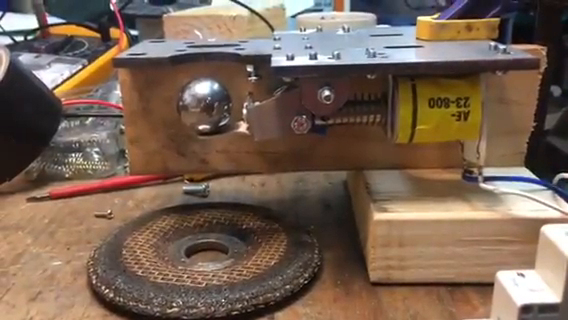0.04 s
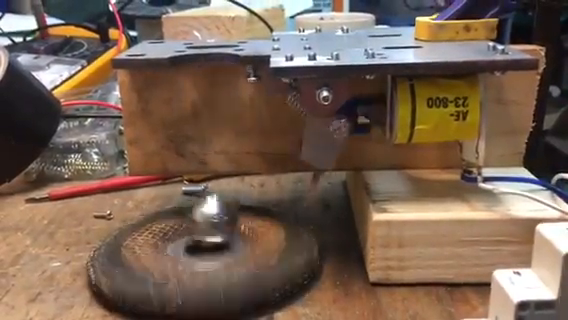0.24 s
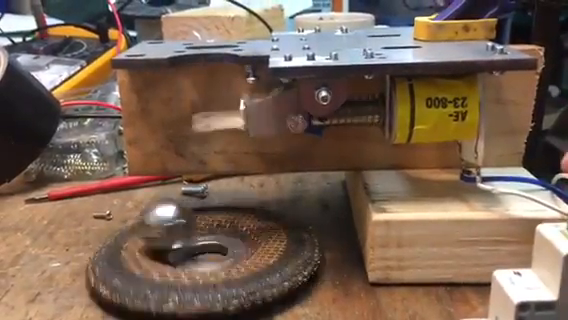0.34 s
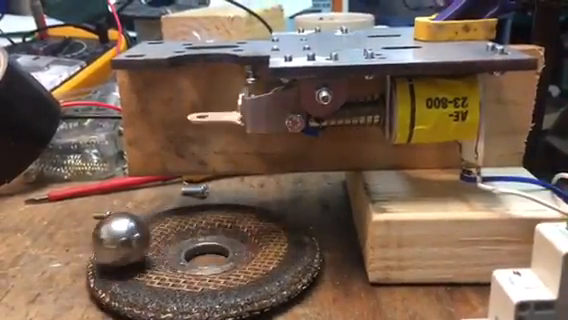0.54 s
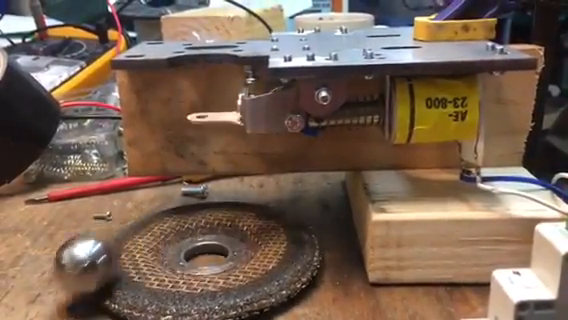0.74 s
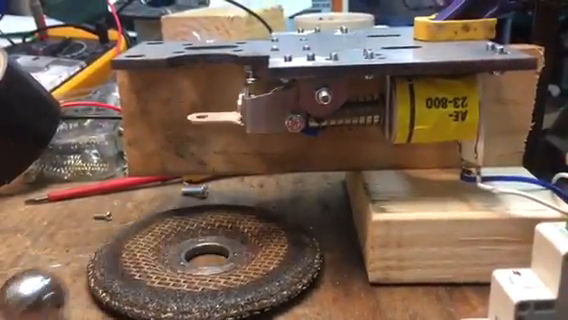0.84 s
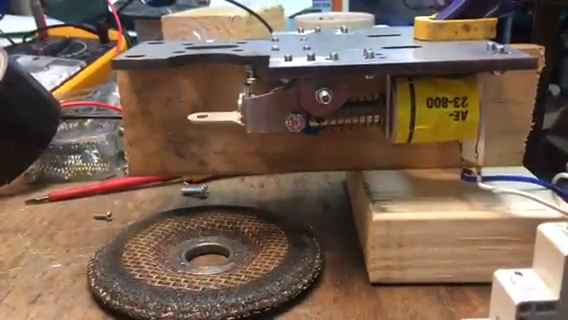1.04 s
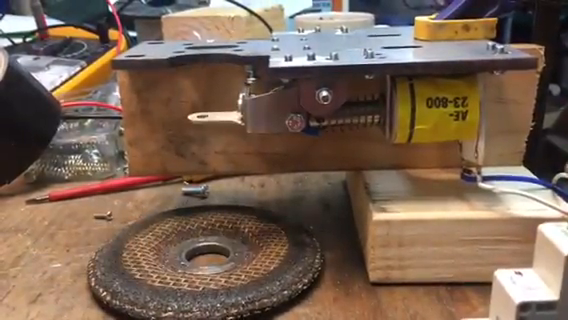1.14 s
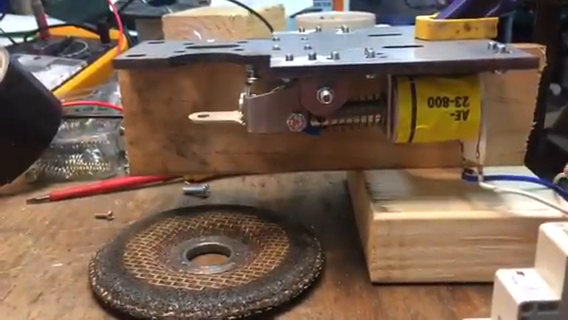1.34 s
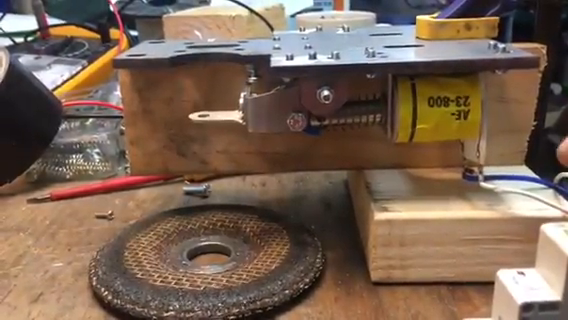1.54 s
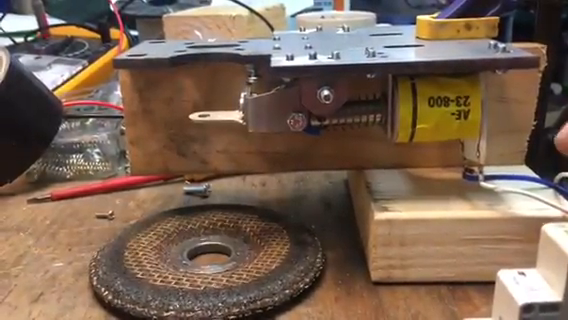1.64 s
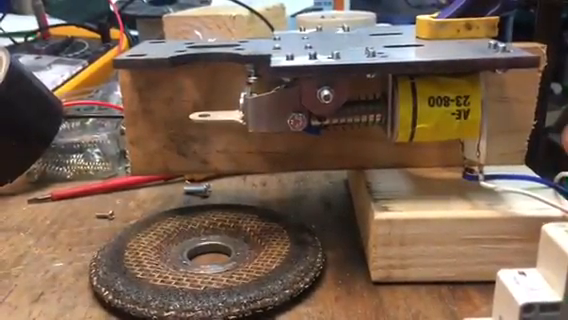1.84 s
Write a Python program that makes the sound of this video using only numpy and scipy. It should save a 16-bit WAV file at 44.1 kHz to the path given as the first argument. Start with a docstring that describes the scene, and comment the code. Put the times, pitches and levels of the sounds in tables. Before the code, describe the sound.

A small metal ball drops and rolls, close to the microphone in a quiet workshop. A latch snaps open and shut around its hard clack on an abrasive disc, then come quickening dull bounces and a soft rumble on wood.

```python
"""A steel ball drops on an abrasive disc lying on a wooden workbench, heard from one close microphone.
A solenoid latch snaps open to release it and slams shut while it bounces, jolting its wooden mount.
The ball ticks across the grit, falls off the rim, bounces ever faster on the ringing bench and rumbles
away, nudging things. Behind it a small workshop hums and gives each blow a short reverberation."""
import sys
import numpy as np
from scipy import signal
from scipy.fft import rfft, irfft, next_fast_len
from scipy.io import wavfile

SR = 44100
rng = np.random.default_rng(int(sys.argv[2]) if len(sys.argv) > 2 else 0)


def wav_record(signal):
    """Record a signal, one row per channel, as 16-bit PCM in the file named by sys.argv[1]."""
    frames = np.transpose(np.atleast_2d(signal))
    bounded = np.clip(frames, -1, 1)
    # unit amplitude maps onto the largest positive 16-bit level
    quanta = np.round(bounded * 32767).astype(np.int16)
    wavfile.write(sys.argv[1], SR, quanta)


N = 83790
SIZE = 16384  # samples in one blow
T, HZ = np.arange(SIZE) / SR, np.fft.rfftfreq(SIZE, 1 / SR)


def amp(db):
    """Decibels to gain."""
    return 10 ** (np.asarray(db) / 20)


def along(points, hz):
    """Read (frequency, value) points on a log frequency axis."""
    freqs, values = np.transpose(points)
    return np.interp(np.log(hz + 1), np.log(freqs + 1), values)


def level(curve):
    """A gain per sample from (time, level) points."""
    return amp(np.interp(np.arange(N) / SR, *np.transpose(curve)))


def fade(t, t60):
    """Exponential decay, 60 dB down after t60."""
    return np.exp(-np.log(1000) * t / t60)


def add(track, start_s, x):
    """Mix a sound into the track."""
    part = track[round(start_s * SR):][:len(x)]
    part += x[:len(part)]


def noise(colour):
    """Steady coloured noise of rms 1."""
    gain = amp(along(colour, np.fft.rfftfreq(N, 1 / SR)))
    x = irfft(rfft(rng.standard_normal(N)) * gain, N)
    return x / x.std()


def shaped(x, gain):
    """Filter a blow with minimum phase, so nothing sounds ahead of the contact."""
    cepstrum = irfft(np.log(np.maximum(gain, 1e-6)))
    cepstrum[1:SIZE // 2] *= 2
    cepstrum[SIZE // 2 + 1:] = 0
    return signal.fftconvolve(x, irfft(np.exp(rfft(cepstrum))))[:SIZE]


def tilted(x, db_per_octave):
    """Harder contacts are brighter, softer ones duller: the spectrum pivots at 2 kHz."""
    return shaped(x, amp(db_per_octave * np.log2(np.maximum(HZ, 500) / 2000)))


def ring(modes, scatter_db, pitch=1, drift_rad=1.8):
    """Damped modes with wandering phase, each stronger or weaker at every blow."""
    out = np.zeros(SIZE)
    for k, (hz, db, t60) in enumerate(modes):
        drift = drift_rad * np.cumsum(rng.standard_normal(SIZE)) / np.sqrt(t60 * SR)
        gain = (-1) ** k * amp(db + scatter_db * rng.standard_normal())
        out += gain * np.sin(2 * np.pi * hz * pitch * T + drift) * fade(T, t60)
    return out


def crack(colour, t60, snap, burst_s, clatter_db):
    """A sharp first pulse and a short burst, with a weaker clatter that dies in t60."""
    x = rng.standard_normal(SIZE) * (fade(T, burst_s) + amp(clatter_db) * fade(T, t60))
    x /= np.linalg.norm(x)
    x[0] += snap
    return shaped(x / np.hypot(1, snap), amp(along(colour, HZ)))


# Reverberation of the small workshop (frequency [Hz], t60 [s])
ROOM_DECAY = [(100, 0.35), (500, 0.17), (2000, 0.19), (8000, 0.14), (16000, 0.17)]


def in_room(x, wet_db=-13.5, delay_s=0.0029):
    """A blow reaches the close microphone directly, then as the room's short, weaker answer."""
    hz, t, spectra = signal.stft(rng.standard_normal(SIZE), SR, nperseg=256)
    spectra = spectra * fade(t, along(ROOM_DECAY, hz)[:, None])
    tail = signal.istft(spectra, SR, nperseg=256)[1][:SIZE]
    tail *= np.clip(T / delay_s - 1, 0, 1)
    return x + amp(wet_db) * signal.fftconvolve(x, tail / np.linalg.norm(tail))[:SIZE]


# Spectrum of the workshop's air (frequency [Hz], level [dB])
AIR_SPECTRUM = [(59, -29.5), (100, -2.5), (181, -20), (570, -31), (970, -26), (1150, -24), (1390, -28),
                (1720, -27.5), (1910, -30.5), (16000, -52)]
# Tones of a machine in the background (frequency [Hz], level [dB])
HUM_TONES = [(560, -73.5), (1120, -70), (1683, -80.5)]


def workshop():
    """Room tone behind the bench: faint air noise and a steady machine hum."""
    t = np.arange(N) / SR
    hum = sum(np.sqrt(2) * amp(db) * np.sin(2 * np.pi * (hz * t + rng.random())) for hz, db in HUM_TONES)
    return hum + amp(-62.5) * noise(AIR_SPECTRUM)


# Course of the bench's low rumble (time [s], level [dB])
RUMBLE_LEVELS = [(0, -53.5), (.6, -56.5), (1.0, -55.5), (1.15, -47), (1.21, -41), (1.27, -55), (1.36, -45),
                 (1.48, -47.5), (1.72, -52.5), (1.88, -48.5)]
# Its spectrum (frequency [Hz], level [dB])
RUMBLE_SPECTRUM = [(20, -38), (40, -9), (60, 4), (76, 0), (100, -18.5), (200, -28), (600, -72)]
# Course of the ball's rolling murmur (time [s], level [dB])
ROLL_LEVELS = [(.48, -76), (.54, -59), (.75, -66), (.85, -51), (1.0, -50.5), (1.12, -53), (1.22, -55.5),
               (1.32, -54), (1.5, -60), (1.68, -55), (1.88, -66)]
# Its spectrum (frequency [Hz], level [dB])
ROLL_SPECTRUM = [(30, -29), (150, -10), (300, 2.5), (480, -4.5), (700, -22), (1300, -23), (2500, -43),
                 (8000, -59.5)]


def rolling():
    """The rolling ball murmurs in the wood over the bench's low rumble."""
    return level(ROLL_LEVELS) * noise(ROLL_SPECTRUM) + level(RUMBLE_LEVELS) * noise(RUMBLE_SPECTRUM)


# Brief high rings (time [s], level [dB], pitch [Hz], t60 [s], overtone level [dB])
HIGH_RINGS = [(0.3445, -16, 5300, .016, -16.5), (.3625, -34, 8400, 0.0097, -17),
              (0.389, -15, 9930, 0.12, -40.5), (0.4365, -20.5, 7803, 0.011, -41),
              (0.4767, -36, 7775, 0.016, -41), (1.6053, -44, 8180, 0.053, -29)]
# Crack at the start of each (frequency [Hz], level [dB])
ONSET_SPECTRUM = [(300, -15.5), (2000, 5), (8000, -13), (16000, -11.5)]


def high_rings(overtone_ratio=2.1):
    """Brief high rings: the disc as the ball strikes it, the latch spring, and a few small clinks."""
    out = np.zeros(N)
    for s, db, hz, t60, overtone_db in HIGH_RINGS:
        tone = ring([(hz, 0, t60), (hz * overtone_ratio, overtone_db, t60)], scatter_db=17)
        onset = amp(12) * crack(ONSET_SPECTRUM, t60=0.022, snap=0.55, burst_s=0.005, clatter_db=-10.5)
        add(out, s, in_room(amp(db) * (tone + onset)))
    return out


# The latch opens, then shuts (time [s], level [dB], brightness [dB/octave], relative jolt level [dB])
LATCH_HITS = [(.151, -34.5, -1.5, -73.5), (0.1967, -20.5, 2, -64), (0.2052, -18.5, -0.5, -67.5),
              (0.2084, 2, 0.5, -27), (.2182, -6.5, -1, -20.5), (0.2366, -30.5, -6, -45),
              (.2475, -32, -8.5, -45.5), (0.2643, -25, -4.5, -40.5), (.288, -29.5, 0, -60.5),
              (0.2979, -28, -4.5, -54), (0.3896, -2.5, 2.5, -4), (0.3931, -1, 1, -12.5),
              (0.4005, -2, -1, -23.5), (0.4056, -9, 4, -29), (0.4115, -16.5, -2.5, -33),
              (0.4235, -12, -3, -28), (.429, -13.5, -1, -25.5)]
# Crack of steel on its stop (frequency [Hz], level [dB])
LATCH_SPECTRUM = [(100, -16.5), (400, -1), (900, 1.5), (1700, -6), (2500, -1.5), (5000, -10), (8000, -3),
                  (12000, -9), (16000, -10.5)]
# Modes of the steel latch (frequency [Hz], level [dB], t60 [s])
LATCH_RING = [(321, -32, 0.14), (424, -31.5, 0.1), (545, -28, 0.1125), (1173, -29, 0.11),
              (1265, -24.5, 0.055), (1695, -17.5, 0.047), (1928, -22, 0.036), (2674, -27, .05),
              (2958, -31, 0.079), (3655, -29.5, 0.058), (4190, -28, 0.042), (5460, -25.5, .05),
              (7750, -25.5, 0.048)]
# Low modes of its wooden mount (frequency [Hz], level [dB], t60 [s])
MOUNT_RING = [(48, 0.5, 0.066), (82, -5, 0.17), (117.5, -0.5, .08), (158, 3, 0.057), (208, 0.5, 0.038)]


def latch():
    """Close up, the steel latch hits its stops and rattles, jolting its wooden mount."""
    out = np.zeros(N)
    for s, db, brightness, jolt_db in LATCH_HITS:
        strike = crack(LATCH_SPECTRUM, t60=0.096, snap=0.23, burst_s=0.023, clatter_db=-11.5)
        steel = amp(12.5) * strike + ring(LATCH_RING, scatter_db=1.5)
        add(out, s, in_room(amp(db) * tilted(steel, brightness)))
        add(out, s, amp(jolt_db - 15) * ring(MOUNT_RING, scatter_db=3.5))
    return out


# The ball lands on the disc (time [s], level [dB], brightness [dB/octave])
DISC_HITS = [(.3179, -2, 3), (.3210, -4, -4), (.3302, -2.5, 0.5), (.337, -8, -1.5), (0.3445, -14, 4),
             (0.4367, -9, 2), (0.4783, -15.5, -1)]
# Crack of ball on disc (frequency [Hz], level [dB])
DISC_SPECTRUM = [(100, -26), (300, -3.5), (550, 2.5), (1300, 6), (2300, -1), (3700, -2), (7500, -9.5),
                 (9000, -20.5), (13500, -17.5), (16000, -25)]
# Modes of the disc (frequency [Hz], level [dB], t60 [s])
DISC_RING = [(497.6, -14.5, 0.059), (704.5, -22.5, 0.04), (886.5, -22, 0.086), (1172, -25.5, 0.092),
             (1478, -31.5, 0.15), (1583, -24.5, 0.092), (2900, -31.5, 0.15), (3040, -32, 0.13),
             (3478, -24, 0.03), (3910, -29.5, 0.067), (5820, -35.5, 0.05), (7770, -27.5, 0.051)]


def ball_on_disc():
    """The dropped ball clacks on the abrasive disc and sets it ringing."""
    out = np.zeros(N)
    for s, db, brightness in DISC_HITS:
        strike = crack(DISC_SPECTRUM, t60=0.04, snap=0.83, burst_s=0.019, clatter_db=-9)
        clack = amp(13.5) * strike + ring(DISC_RING, scatter_db=1.5)
        add(out, s, in_room(amp(db) * tilted(clack, brightness)))
    return out


# The ball meets grains of grit (time [s], relative level [dB], brightness [dB/octave])
GRIT_HITS = [(0.536, -20, -3), (0.593, -9, -4), (0.6129, -8.5, -6.5), (0.6218, 3, -6), (.651, -5.5, -5),
             (.6965, 0, -3), (0.7236, -7, -5.5), (0.7604, -4.5, -2), (0.7844, -8.5, 1.5), (.789, 3, -6),
             (0.802, -27, 5), (0.8216, -13.5, -4), (.828, 8.5, -3.5), (0.8312, -1.5, 0.5),
             (.8435, -13.5, 5), (.853, -6.5, -15.5), (0.8575, 7.5, 2.5)]
# Crack of one grain (frequency [Hz], level [dB])
GRIT_SPECTRUM = [(200, 2), (1000, 12), (3500, -3), (8000, -8.5), (16000, -7)]
# Modes rung by a tick (frequency [Hz], level [dB], t60 [s])
GRIT_RING = [(977, -12.5, .03), (2200, -8, 0.058), (2670, -3.5, 0.015), (3706, -5, .025), (3875, -4, 0.019),
             (5520, -9, 0.035), (7790, -2, 0.013), (10600, -15.5, 0.016)]


def ball_on_grit(gain_db=-48):
    """The ball ticks over the disc's grit, faint even this close."""
    out = np.zeros(N)
    for s, db, brightness in GRIT_HITS:
        grain = crack(GRIT_SPECTRUM, t60=0.018, snap=0.51, burst_s=0.012, clatter_db=-4.5)
        tick = amp(16.5) * grain + ring(GRIT_RING, scatter_db=5.5)
        add(out, s, in_room(amp(gain_db + db) * tilted(tick, brightness)))
    return out


def bounces(fall_s=0.8712, fall_db=2.5, cutoff_hz=2030, first_flight_s=0.0387, restitution=0.71):
    """Off the rim, the ball loses energy at each knock: the next is sooner, quieter and duller."""
    knocks = []
    for k in range(9):
        s = fall_s + first_flight_s * (1 - restitution ** k) / (1 - restitution)
        knocks.append((s, fall_db - 6 * k ** 0.69, cutoff_hz * 0.88 ** k, 1))
    return knocks


# Dull knocks on the bench (time [s], level [dB], contact cut-off [Hz], pitch of the bench's modes [ratio])
BENCH_KNOCKS = [(.3672, -12, 3020, 1.34), (.3868, -0.5, 1820, 0.96), (.3970, -1, 2220, 0.93),
                (.4558, -9.5, 1810, 0.95), (.498, -33, 1300, 1.9), (.540, -34, 1462, 0.66),
                (1.029, -30.5, 700, .9), (1.055, -28.5, 650, 0.75), (1.083, -27, 550, 0.66),
                (1.118, -23.5, 600, 0.54), (1.198, -21.5, 541, 0.58), (1.25, -33, 696, 0.69),
                (1.339, -30.5, 699, 0.692), (1.427, -29, 451, 0.68), (1.5795, -23.5, 1190, 0.71),
                (1.589, -23.5, 994, 0.78), (1.712, -28.5, 950, 0.76), (1.7755, -31.5, 806, 0.57),
                (1.892, -34.5, 894, 0.83)]
# Thud of the wood (frequency [Hz], level [dB])
BENCH_SPECTRUM = [(80, -27), (250, -10), (500, 1), (1400, -5.5), (2300, -4.5), (4000, 1.5), (7000, -7.5),
                  (16000, -10)]
# Modes of the bench (frequency [Hz], level [dB], t60 [s])
BENCH_RING = [(357.9, -24.5, 0.034), (432, -23, .06), (510, -21, 0.1), (602, -20.5, .035), (821, -20, .025),
              (1012, -12.5, 0.023), (1137, -19.5, 0.039), (1312, -15, 0.027), (1605, -17, 0.034),
              (1850, -16.5, 0.021), (2600, -20.5, 0.034), (3790, -16.5, .02)]
# Reflections off nearby boards (delay [s], gain [ratio])
BOARD_ECHOES = [(.0012, 0.2), (.0039, 0.48)]


def ball_on_bench():
    """Knocks and bounces ring the same wood by the microphone; gentler contacts are duller."""
    out = np.zeros(N)
    for s, db, cutoff_hz, pitch in list(BENCH_KNOCKS) + bounces():
        thud = amp(12) * crack(BENCH_SPECTRUM, t60=0.0435, snap=0.67, burst_s=0.019, clatter_db=-10)
        echoes = sum(gain * np.interp(T - delay, T, thud, left=0) for delay, gain in BOARD_ECHOES)
        wood = thud + echoes + ring(BENCH_RING, scatter_db=1.5, pitch=pitch)
        contact = 1 / np.hypot(1, (HZ / cutoff_hz) ** 4.2) + amp(-39)  # a little treble leaks through
        add(out, s, in_room(amp(db) * shaped(wood, contact), wet_db=-13))
    return out


def scene():
    """Everything at one microphone close to the bench."""
    blows = latch() + ball_on_disc() + ball_on_grit() + ball_on_bench() + high_rings()
    return (blows + rolling() + workshop())[None]


def record(dry, low_cut_hz=38, ceiling=0.8, top_hz=15650):
    """The recorder drops the deepest bass, rounds off the highest peaks and cuts the top treble."""
    x = signal.sosfilt(signal.butter(3, low_cut_hz, "high", fs=SR, output="sos"), dry)
    x = x / (1 + np.abs(x / ceiling) ** 6) ** (1 / 6)
    size = next_fast_len(N + SIZE)
    rolloff = np.hypot(1, (np.fft.rfftfreq(size, 1 / SR) / top_hz) ** 80)
    return irfft(rfft(x, size) / rolloff, size)[:, :N]


dry = scene()
out = record(dry)
wav_record(out)
```